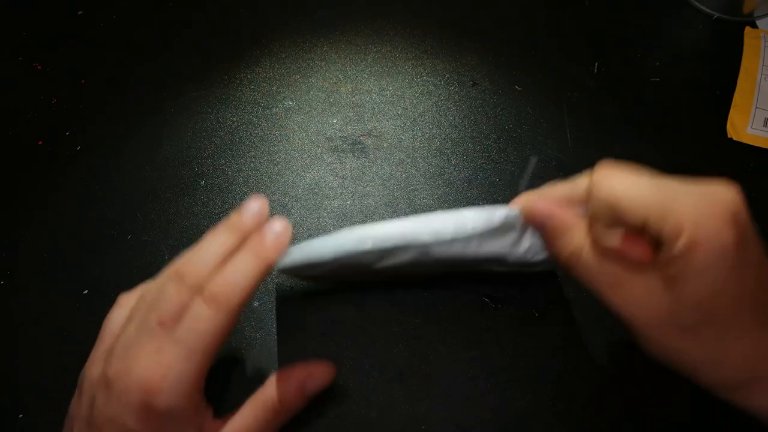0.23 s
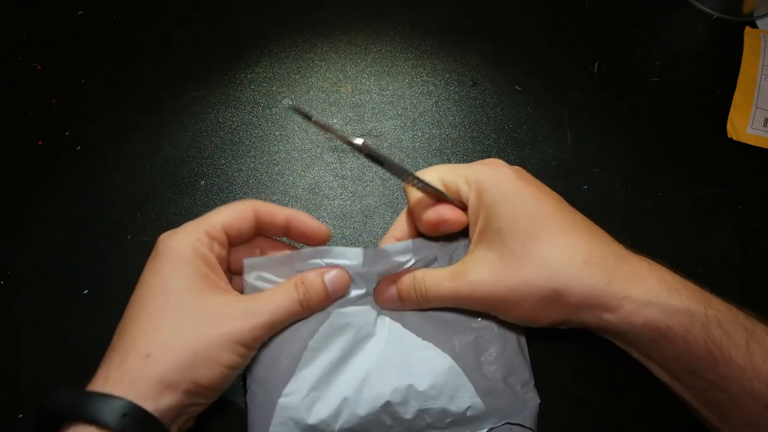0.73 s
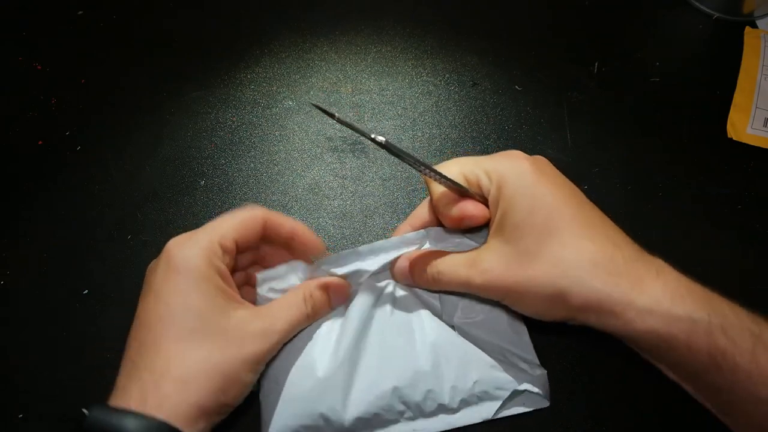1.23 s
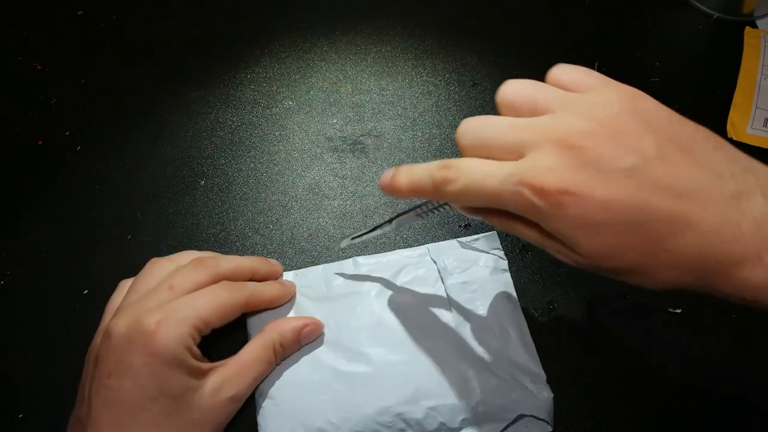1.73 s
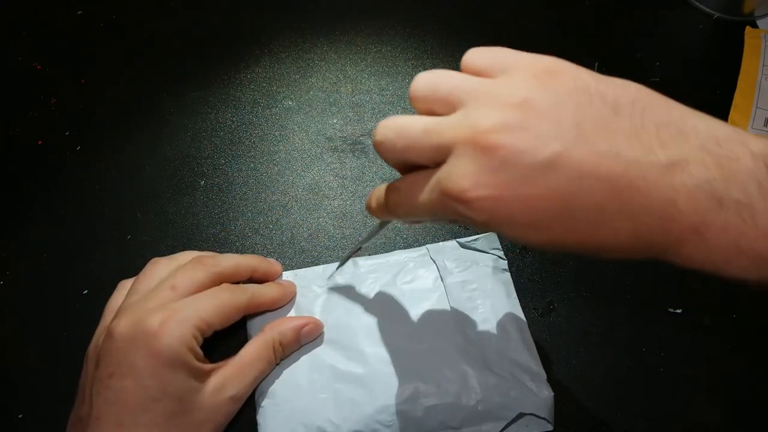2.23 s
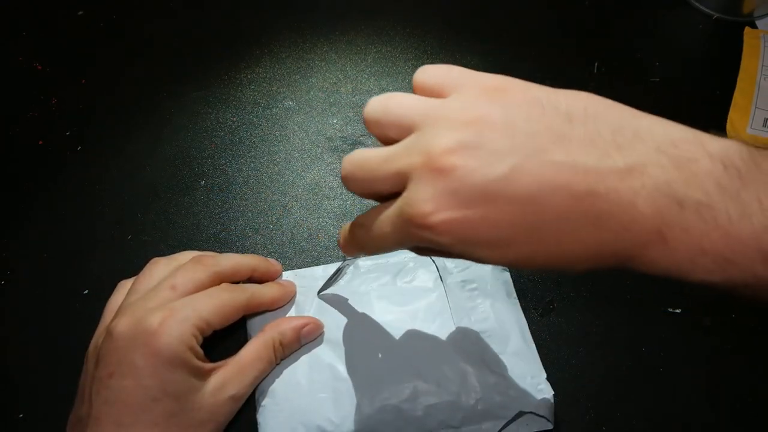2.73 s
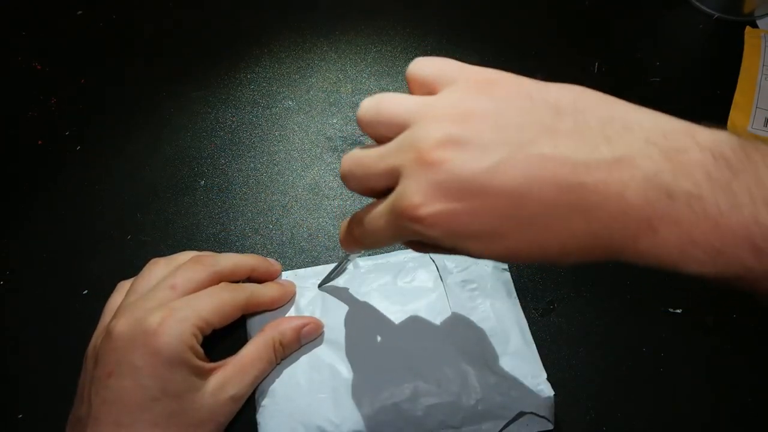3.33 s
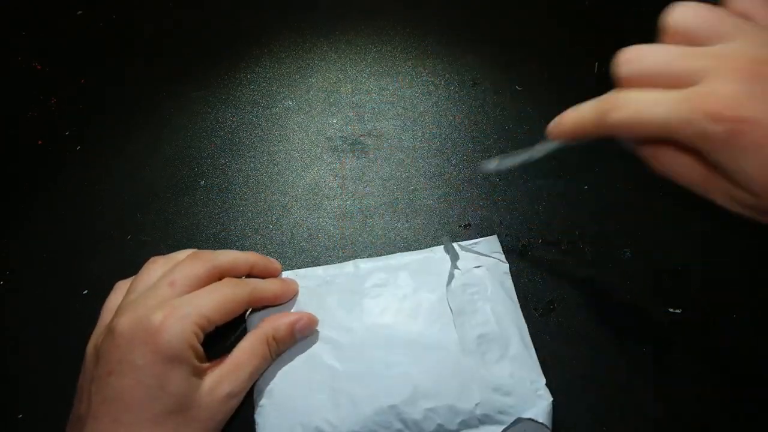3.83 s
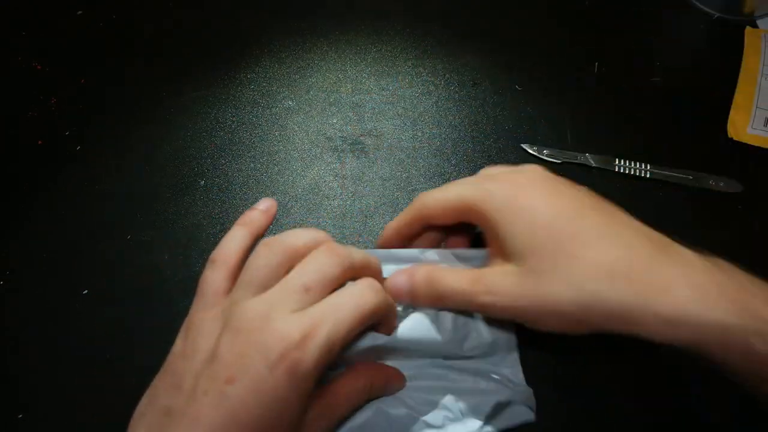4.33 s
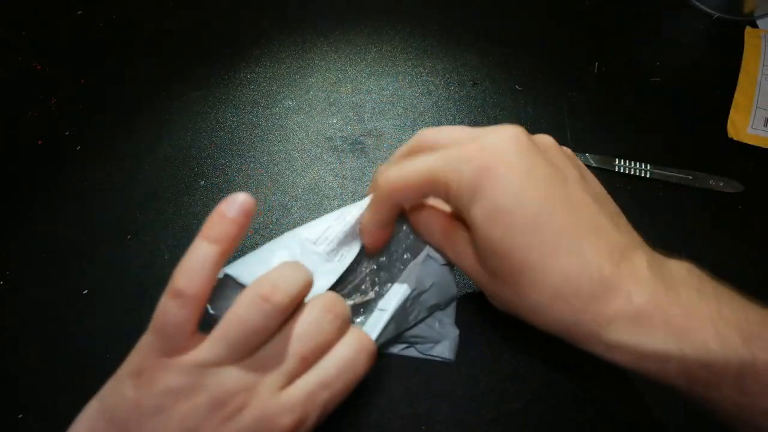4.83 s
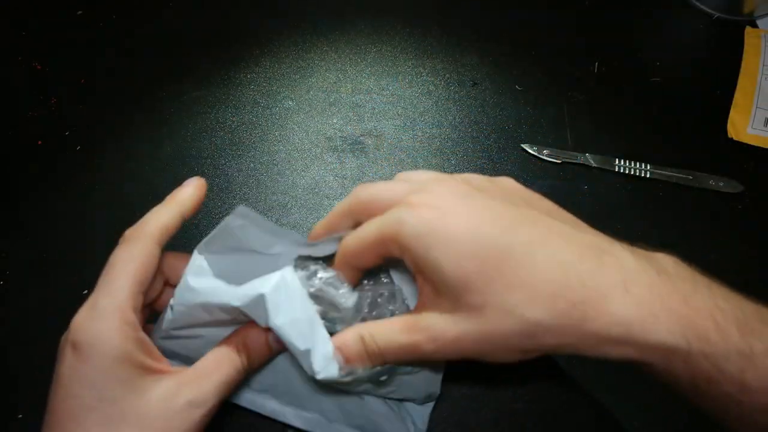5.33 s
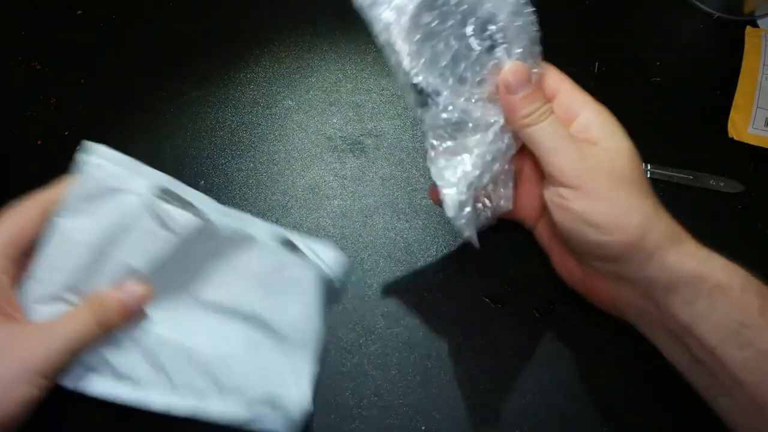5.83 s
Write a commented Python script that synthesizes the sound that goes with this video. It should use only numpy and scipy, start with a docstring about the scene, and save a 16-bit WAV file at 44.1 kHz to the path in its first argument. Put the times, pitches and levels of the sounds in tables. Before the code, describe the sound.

Crisp plastic film crackles and pops in both hands, with one dull thud on the desk. A long hush follows, with faint ticks and soft bumps, until the film snaps in a quick flurry. Several woody taps and a thin steel chatter mark a blade put down; then bright, uneven crinkling and rustling continue to the end. Close stereo microphone above the desk, slight short room reflection, faint hiss.

```python
"""A thin plastic mailer is turned on a desk, slit with a steel knife and emptied of its bubble wrap.
Creases in the film buckle as sharp snaps and lone ticks over a dense crackle, each a click and a shiver.
Short pushes thud on the desk top, moving hands rumble through it, and the knife rattles and rings.
A small room answers over faint room tone and hiss; two close microphone ports hear it from above."""
import sys
import numpy as np
from scipy import signal
from scipy.fft import rfft, irfft
from scipy.io import wavfile

SR = 44100
rng = np.random.default_rng(int(sys.argv[2]) if len(sys.argv) > 2 else 0)


def gain_from_db(level_db):
    """Convert decibel levels to linear amplitude factors (20 dB per decade)."""
    decades = np.asarray(level_db, float) / 20
    return 10 ** decades


def master(y):
    """Save y as 16-bit WAV."""
    cut = np.clip(np.atleast_2d(y).T, -1, 1)
    pcm = np.round(cut * 32767)  # scale
    wavfile.write(sys.argv[1], SR, pcm.astype(np.int16))


N = 267907  # length in samples

# Table levels are relative: each source adds its own gain.
# single creases that snap:
# (time [s], peak level [dB], body level [dB re peak], top level [dB re peak], pocket pitch [Hz])
SNAP_CREASES = [(0.1771, -8, -12, -27.5, 1510), (0.2333, -15, -8, -10, 1020), (0.2557, 0.5, -25, -48, 3900),
                (0.3433, -17, -33.5, -10, 1744), (0.44, -12, -45, -45.5, 1764),
                (0.5006, -10.5, -23.5, -13.5, 1040), (0.5934, -17.5, -1.5, -38, 3240),
                (0.7209, -13, -44, -4.5, 3120), (0.751, -20, -1, -15, 900), (0.915, -14, -34.5, -4.5, 1010),
                (0.9392, -14, -16.5, -10, 1040), (0.9707, -19.5, -30, -5, 3920),
                (0.9998, -11, -24.5, -8, 1550), (1.0235, -19.5, -3.5, -41.5, 1054),
                (1.1121, -9.5, -29, -22, 2740), (1.1286, -14.5, -23, -7, 3050),
                (1.1843, -10.5, -24.5, -16, 5000), (1.2993, -19, -12.5, -3, 1050),
                (1.593, -23, -14, -18, 1400), (1.7021, -28, -23, -10.5, 5500),
                (1.98, -42.5, -4.5, -9, 5850), (2.0505, -34.5, -19, -19, 3670),
                (2.359, -34.5, -16, -53, 2010), (2.4674, -24.5, -21, -16.5, 2980),
                (2.7757, -13.5, -102, -17, 4800), (2.811, -22.5, -27, -13, 1950),
                (2.832, -15, -29.5, -28.5, 4200), (2.9709, -8.5, -17, -5.5, 1980),
                (3.2078, -34, 1, -5.5, 816), (3.488, -25.5, -37, -9, 2610), (3.628, -6.5, -8, -13, 5330),
                (3.6562, -13, -2, -17, 1100), (3.6958, -7.5, -9.5, -14.5, 5200),
                (3.7393, -8, -20, -10.5, 1060), (3.794, -14.5, -23, -7, 1610),
                (3.9118, -15.5, -14, -6, 2440), (4.231, -27.5, 5, 10, 970), (4.3007, -10, -55, -10.5, 5300),
                (4.369, -25, 2.5, 2.5, 1070), (4.518, -11, -30, -16, 4780),
                (4.5731, -10.5, -4, -16.5, 1005), (4.6552, -10, -23, -21, 3300), (4.778, -30, -9, 5, 1080),
                (4.9113, -10, -10.5, -8.5, 1010), (5.0715, -20.5, -13, 5.5, 3400),
                (5.2755, -12, -22, -4.5, 4700), (5.2913, -12.5, -23, -8.5, 3980),
                (5.3626, -15, -14, -38, 1820), (5.421, -7.5, -78, -12, 6200), (5.469, -18.5, -18, -7, 2200),
                (5.6263, -19.5, -11, 2.5, 5070), (5.721, -11.5, -16.5, -20, 3400)]
# lone bright ticks, one small fold flipping over with nothing after it: (time [s], peak level [dB])
TICK_FOLDS = [(0.1187, -27), (0.1592, -17), (0.1909, -15), (0.6503, -20), (0.7332, -10), (0.8343, -13),
              (0.9638, -9), (0.9863, -7), (1.137, -20), (1.1463, -13), (1.156, -10), (1.3098, -10),
              (3.480, -25), (3.5156, -20.5), (3.5656, -14), (3.5927, -9), (3.6072, -24), (3.6821, -9),
              (4.3816, -10.5), (4.5978, -6), (4.668, -5), (4.7346, -17), (4.7974, -24), (4.8568, -12)]
# each grip, turn, cut or pull of the bag sets off a spell of crackle:
# (time [s], level [dB], length [s], body level near 1 kHz [dB re middle], pocket pitch [Hz])
GRIP_SPELLS = [(0.051, -35.5, 0.14, -7.5, 1490), (0.188, -28.5, 0.034, -9, 1395),
               (0.243, -31.5, 0.023, -21, 1040), (0.365, -38, 0.0072, -12, 1785),
               (0.442, -35, 0.015, -12.5, 1770), (0.506, -33, 0.048, -6.5, 1034),
               (0.609, -35, 0.19, -5.5, 1027), (0.746, -29.5, 0.013, -25, 950),
               (0.835, -37, 0.028, -9, 1000), (0.931, -29.5, 0.12, -9.5, 1014),
               (1.029, -34, 0.037, 10.5, 972), (1.143, -28.5, 0.089, -12, 1430),
               (1.305, -31, 0.061, -6.5, 1120), (1.369, -37.5, 0.081, -4.5, 1172),
               (1.565, -49.5, 0.047, -10, 1430), (1.656, -63.5, 0.052, 4, 1035),
               (2.21, -64, 0.019, -3.5, 3900), (2.501, -53, 0.02, -4.5, 1500),
               (2.758, -62, 0.035, -15, 5000), (3.199, -52.5, 0.016, -3, 1940),
               (3.547, -33.5, 0.16, -7.5, 1360), (3.593, -28.5, 0.18, -3, 1490),
               (3.91, -43.5, 0.089, -5.5, 2510), (4.131, -46.5, 0.25, 23.5, 1004),
               (4.393, -33, 0.028, -11.5, 1064), (4.467, -35.5, 0.14, -9.5, 1053),
               (4.584, -25.5, 0.054, -9, 1027), (4.672, -30.5, 0.15, -13, 1053),
               (4.779, -29.5, 0.031, -11, 1050), (4.837, -37, 0.16, -13.5, 1000),
               (5.005, -32.5, 0.1, -12, 1110), (5.048, -31.5, 0.053, -8.5, 1085),
               (5.219, -39.5, 0.12, -13.5, 4100), (5.279, -31.5, .04, -8.5, 3900),
               (5.338, -37.5, 0.085, -9.5, 1050), (5.456, -40.5, 0.15, -16.5, 2200),
               (5.53, -40, 0.13, -16, 2180), (5.62, -31, 0.033, -16, 1565),
               (5.674, -32.5, 0.074, -16, 1547), (5.751, -38.5, 0.091, -9.5, 837)]
# faint crackle of the bag between grips: (time [s], level [dB])
RESTING_CRACKLE = [(0, -47), (1.45, -51), (1.75, -69), (2.5, -81), (3.0, -67.5), (3.18, -85), (3.46, -76),
                   (4.2, -45.5), (5.15, -50), (6.07, -52.5)]
# bands of the film's sound: (low edge [Hz], high edge [Hz], level [dB], full ring time [ms])
FILM_BANDS = [(248, 643, -15.5, 13), (680, 1360, -6, 11.4), (1240, 2470, -5.5, 10.9),
              (2690, 4430, -6.5, 11.5), (4280, 7070, -4.5, 7.9), (7160, 9870, -8.5, 10.5),
              (10350, 15450, -1.5, 12)]
# blows on the desk top: (time [s], level [dB], contact time [ms])
DESK_KNOCKS = [(.578, -10.5, 2.2), (3.216, -22.5, 2.4), (3.301, -29.5, 1.4), (3.991, -2.5, 0.83),
               (4.022, -6.5, 0.79), (4.076, -2, 0.29), (4.148, -9.5, 0.4), (4.157, -10.5, 0.7),
               (4.194, -12.5, 0.78)]
# strong modes of the desk top: (frequency [Hz], level [dB], 60 dB decay time [s])
DESK_MODES = [(300, -11, 0.21), (469, -4.5, 0.13), (649, -4, .07), (708, 4.5, 0.041), (844, -9, 0.062),
              (950, -10, 0.042), (1061, -3, 0.099), (1392, 1.5, .05), (1657, -4, 0.037), (2010, -15, 0.027)]
# hands and bag drag or bump on the desk top: (time [s], level [dB], length [s])
DESK_DRAGS = [(0.006, -60, 0.25), (0.595, -46, 0.055), (1.155, -57, 0.062), (1.304, -56, 0.077),
              (2.515, -69, 0.13), (3.24, -66, 0.076), (3.583, -47.5, 0.14), (3.69, -46.5, 0.08),
              (4.043, -47.5, 0.17), (4.395, -49, 0.017), (4.6, -60, .2), ]
# the knife chatters on the desk: (time [s], level [dB], rise time [ms], ring of the steel [dB])
KNIFE_CHATTER = [(3.99, -6.5, 3.8, -32), (4.076, -3, 1.6, -39), (4.079, -12.5, 5.1, -20),
                 (4.151, -32.5, 11.3, -8.5)]
# modes of the steel: (frequency [Hz], level [dB], 60 dB decay time [s])
KNIFE_MODES = [(6800, -13, .02), (10520, -10, .02), (11700, -9, .012), (13080, -9, .02), (13470, -5, .02),
               (13750, 0, .03), (14300, -4, .02)]
# diffuse tail of the room by band: (centre [Hz], 60 dB decay time [s], level [dB])
ROOM_BANDS = [(400, .3, -15), (2000, .25, -15), (6000, .27, -12), (13000, .22, -13)]
# colour of room tone and hiss: (frequency [Hz], relative level per Hz [dB])
AIR_COLOUR = [(30, -34), (161, -16), (449, 26), (1430, -19), (2980, -6.5), (7670, -32), (13700, -4),
              (16000, 12.5)]

SIDE_DB = 0.8  # the hands work slightly left: left minus right


def snaps():
    """Each big crease is followed within 7 ms by five smaller ones of like colour, and rings its pocket."""
    s, peak_db, body_db, top_db, pocket_hz = np.transpose(SNAP_CREASES)
    db = peak_db - 12.0 + np.array([body_db + 5.0, 0 * s, top_db + 10.0])
    chance = rng.random((len(s), 3, 5))
    later = s[:, None] + .007 * chance[:, 0]
    smaller = db[:, :, None] - 20.5 - 12 * chance[:, 1]
    pan_db = SIDE_DB + 0 * s
    spread = (pan_db[:, None] + 5 * (chance[:, 2] - .5)).ravel()
    # the louder port hears the crease first
    first = buckle(s, db, pan_db, -.4 * pan_db, scatter_db=1.0, click=9.0, ring_share=.75)
    rest = buckle(later.ravel(), smaller.reshape(3, -1), spread, -.4 * spread,
                  scatter_db=5.5, click=5.0, ring_share=.6)
    return first + rest + pockets(s, pocket_hz, peak_db - 14.5, pan_db, cycles=5)


def ticks():
    """A small fold flips over: a click with little body and a shiver that dies quickly."""
    s, peak_db = np.transpose(TICK_FOLDS)
    db = peak_db - 15.0 + np.array([[-12.0], [0], [-1.5]])
    return buckle(s, db, SIDE_DB + 0 * s, 0 * s, scatter_db=2.5, click=13.0, ring_share=.45)


def crackle():
    """Small creases at random moments, a few larger than the rest; one in four rings the pocket under the hand."""
    chance = rng.random((8000, 5))
    s = chance[:, 0] * N / SR
    grips = spells(s, GRIP_SPELLS, rise_db_s=479, sag_db=10, fall_db_s=349.5)
    rest = gain_from_db(np.interp(s, *np.transpose(RESTING_CRACKLE))) ** 2
    power = rest + grips.sum(axis=0)

    # body re middle, weighted by the power of bag at rest (-7 dB) and of each grip
    body = (rest * -7 + np.array(GRIP_SPELLS)[:, 3] @ grips) / power
    top = -3 + 0 * s
    db = 10 * np.log10(power) + np.array([body, 0 * s, top])
    # exponential spread of the size in dB: most creases small, a few large
    db = db - 11.0 - 4.04 * np.log(1 - chance[:, 1] + 0.013)
    pan_db = SIDE_DB + 6 * (chance[:, 2] - .5)

    # the strongest grip at each moment gives the pocket's pitch
    hz = np.array(GRIP_SPELLS)[grips.argmax(axis=0), -1] * (1 + 0.17 * (chance[:, 4] - .5))
    held_db = 10 * np.log10(1 - rest / power + 1e-6)
    ring_db = np.where(hz < 1300, db[0] + 6.5, db[1]) + held_db
    rings = pockets(s[::4], hz[::4], ring_db[::4], pan_db[::4], cycles=11.2)
    film = buckle(s, db, pan_db, 4 * (chance[:, 3] - .5), scatter_db=5.0, click=9.0, ring_share=.65)
    # other creases ring a taut patch of any size
    patch_hz = 900 * 6 ** chance[1::4, 4]
    patches = pockets(s[1::4], patch_hz, db[1, 1::4] - 5.0, pan_db[1::4], cycles=6.1)
    return rings + patches + film


def buckle(s, db, pan_db, lag, scatter_db, click, ring_share):
    """Each crease gives a click and a short shiver of the sheet around it; db is (body, middle, top) per crease.

    lag: samples, added at the left port and taken off at the right; ring_share scales the full ring time.
    """
    out = 0
    colour = rng.standard_normal((len(s), len(FILM_BANDS)))
    sign = np.sign(rng.standard_normal(len(s)))
    for k, (low, high, film_db, ring_ms) in enumerate(FILM_BANDS):
        # where the band lies between body (0), middle (1) and top (2)
        place = np.interp(np.log(low * high) / 2, np.log([900, 4000, 12500]), [0, 1, 2])
        share = np.clip(1 - abs(place - np.arange(3)), 0, 1)
        size = gain_from_db(share @ db + film_db + scatter_db * colour[:, k])
        side = [(s + way * lag / SR, size * gain_from_db(way * pan_db / 2)) for way in (1, -1)]
        clicks = np.array([train(t, a * sign) for t, a in side])
        power = np.array([train(t, a ** 2) for t, a in side])
        decay = np.exp(-2000 / (ring_share * ring_ms) / SR)
        shiver = np.sqrt(signal.lfilter([1], [1, -decay], power))
        noise = ports(rng.standard_normal(N), np.clip(low / 1940.0, .25, .8))
        out = out + band(click * clicks + shiver * noise, low, high)
    return out


def pockets(s, hz, db, pan_db, cycles):
    """Air pockets and taut patches of the bag ring at their own pitch, falling to 1/e in the given cycles."""
    t = np.arange(1024) / SR
    wave = gain_from_db(db)[:, None] * np.sin(2 * np.pi * hz[:, None] * t) * np.exp(-t * hz[:, None] / cycles)
    at = np.clip((s * SR).astype(int)[:, None] + np.arange(1024), 0, N - 1).ravel()
    sides = [(wave * gain_from_db(way * pan_db / 2)[:, None]).ravel() for way in (1, -1)]
    return np.array([np.bincount(at, side, N) for side in sides])


def spells(t, rows, rise_db_s, sag_db, fall_db_s):
    """Power of each spell at times t: it swells, sags by sag_db over its length, then fades faster."""
    s, db, length = (np.array(rows)[:, k, None] for k in range(3))
    since = t - s
    swell = rise_db_s * since
    fade = -sag_db * since / length - fall_db_s * np.maximum(since - length, 0)
    return gain_from_db(db + np.where(since < 0, swell, fade)) ** 2


def train(s, size):
    """Impulses of the given sizes at the given times."""
    return np.bincount(np.clip(np.round(s * SR).astype(int), 0, N - 1), size, N)


def band(x, low_hz, high_hz):
    """Band-pass with unit power gain on white noise."""
    sos = signal.butter(2, [low_hz, high_hz], "band", fs=SR, output="sos")
    return signal.sosfilt(sos, x) / np.sqrt((high_hz - low_hz) / (SR / 2))


def ports(near, width):
    """Noise at the left and right microphone ports, less alike as width grows."""
    difference = width * rng.standard_normal(N) * np.array([[1], [-1]])
    return (near + difference) / np.sqrt(1 + width ** 2)


def ring(x, modes):
    """A bank of decaying resonances driven by x."""
    t = np.arange(SR // 2) / SR
    response = sum(gain_from_db(db) * np.sin(2 * np.pi * hz * t) * 1000. ** (-t / t60) for hz, db, t60 in modes)
    return signal.fftconvolve(x, response)[:N]


def desk():
    """Half-sine pushes ring the desk top; moving hands rumble through it."""
    force = np.zeros(N)
    for s, db, contact_ms in DESK_KNOCKS:
        n, i = int(contact_ms * SR / 1000) + 2, int(s * SR)
        force[i:i + n] += gain_from_db(db) * np.sin(np.pi * np.arange(n) / n) / n

    drags = spells(np.arange(N) / SR, DESK_DRAGS, rise_db_s=249, sag_db=8.5, fall_db_s=205.5).sum(axis=0)
    quiet = gain_from_db(-82.5) ** 2  # a faint rumble stays throughout
    rumble = band(ports(rng.standard_normal(N), 0.42), 33, 260) * np.sqrt(drags + quiet)

    # between the strong modes lie too many weak ones to count: a decaying woody noise
    t = np.arange(SR // 4) / SR
    dense = band(ports(rng.standard_normal(N), 0.24)[:, :len(t)], 290, 2200) * 1000. ** (-t / 0.1)
    strong = gain_from_db(-9) * ring(force, DESK_MODES)
    weak = gain_from_db(-4.0) * signal.fftconvolve(force[None], dense, axes=1)[:, :N]
    # a board this size radiates little deep bass
    low_cut = signal.butter(2, 225, "high", fs=SR, output="sos")
    return signal.sosfilt(low_cut, strong + weak) + rumble


def knife():
    """Swelling bursts of tiny contacts excite the steel; each port hears another mix."""
    t = np.arange(N) / SR
    _, db, _, ring_db = np.transpose(KNIFE_CHATTER)
    rise = np.array([np.clip(t - s, 0, 1) * 1000 / ms for s, _, ms, _ in KNIFE_CHATTER])
    bursts = rise * np.exp(1 - rise)
    noise = ports(rng.standard_normal(N), 0.91)
    steel = np.array([ring(c, KNIFE_MODES) for c in gain_from_db(db + ring_db) @ bursts * noise])
    rattle = band(gain_from_db(db) @ bursts * noise, 1100, 8100)
    return steel + gain_from_db(-20.5) * rattle


def room(x):
    """Walls send back a diffuse tail, shorter in the treble, that builds up over a few milliseconds."""
    t = np.arange(SR // 2) / SR
    tail = 0
    for hz, t60, db in ROOM_BANDS:
        noise = rng.standard_normal((2, len(t)))
        # the ports hear less alike tails as pitch rises
        noise[1] = noise[0] + min(hz / 2700.0, 1.5) * noise[1]
        noise /= noise.std(axis=1, keepdims=True)
        fade = (1 - np.exp(-t / 0.0064)) * 1000. ** (-t / t60) * np.sqrt(np.log(1e6) / t60 / SR)
        edges_hz = [hz / 9.5, min(hz * 2.2, .45 * SR)]
        sos = signal.butter(1, edges_hz, "band", fs=SR, output="sos")
        tail = tail + gain_from_db(db) * fade * signal.sosfilt(sos, noise)
    return signal.fftconvolve(x.mean(axis=0, keepdims=True), tail, axes=1)[:, :N]


def air():
    """Faint room tone and microphone hiss: coloured noise, less alike at the two ports in the treble."""
    hz = np.arange(N // 2 + 1) * SR / N + 1
    colour_hz, colour_db = np.transpose(AIR_COLOUR)
    gain = gain_from_db(np.interp(np.log(hz), np.log(colour_hz), colour_db))
    widths = (1, np.clip(hz / 2500, .3, 1))
    mid, side = (irfft(rfft(rng.standard_normal(N)) * gain * w, N) for w in widths)
    x = mid + side * np.array([[1], [-1]])
    return x * gain_from_db(-69.5) / np.sqrt(np.mean(x ** 2))  # rms level in dB


def scene():
    """Film, desk and knife up close, their room tail and the quiet air."""
    # a thin sheet radiates no bass
    low_cut = signal.butter(2, 278, "high", fs=SR, output="sos")
    film = signal.sosfilt(low_cut, snaps() + ticks() + crackle())
    near = film + desk() + knife()
    return near + room(near) + air()


def low_pass(x):
    """Removes everything above the highest recorded frequency."""
    return signal.sosfilt(signal.butter(12, 16810, fs=SR, output="sos"), x)


def record(dry):
    """The top is cut steeply above 15.8 kHz to finish the mix."""
    top_cut = signal.ellip(8, .2, 30, 15800, fs=SR, output="sos")
    mix = signal.sosfilt(top_cut, dry)
    return low_pass(mix)


dry = scene()
out = record(dry)
master(out)
```